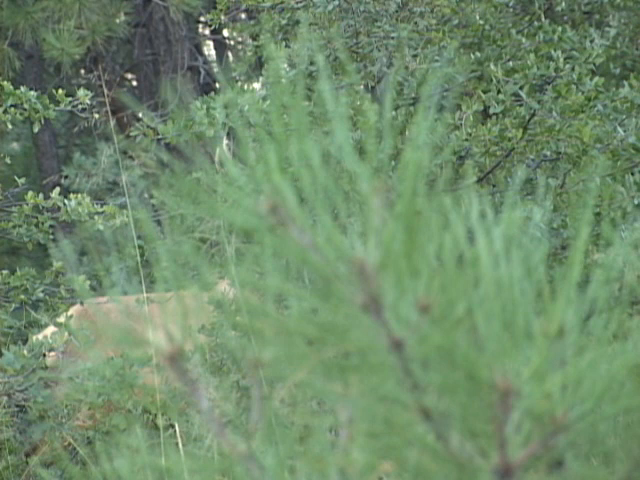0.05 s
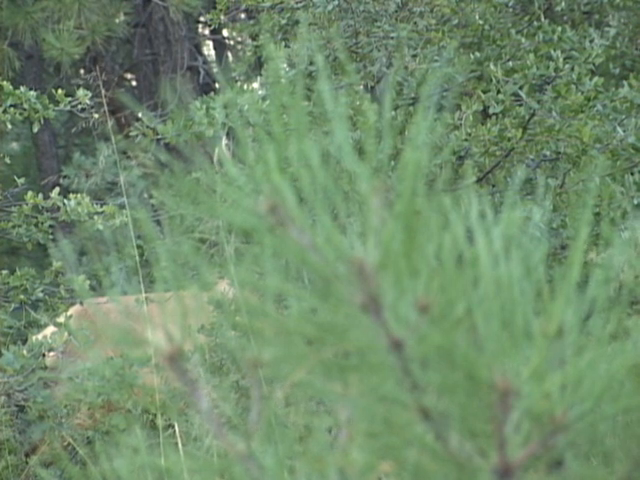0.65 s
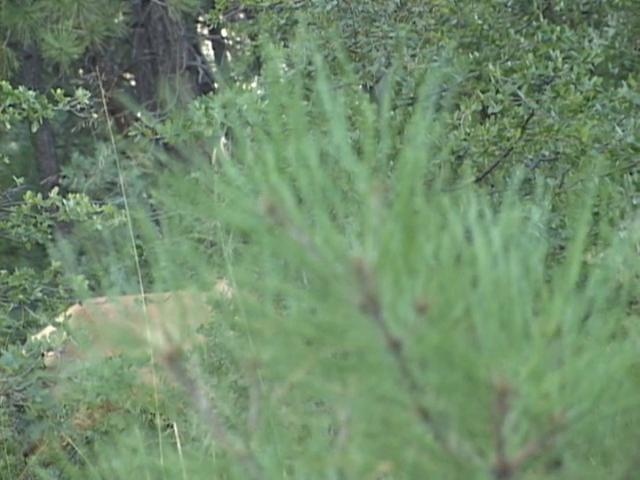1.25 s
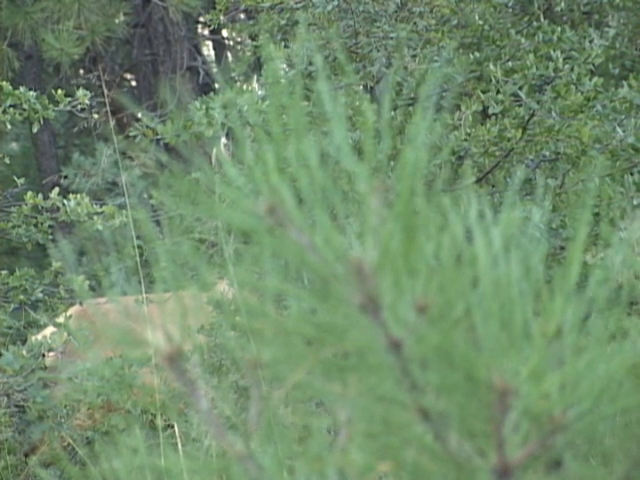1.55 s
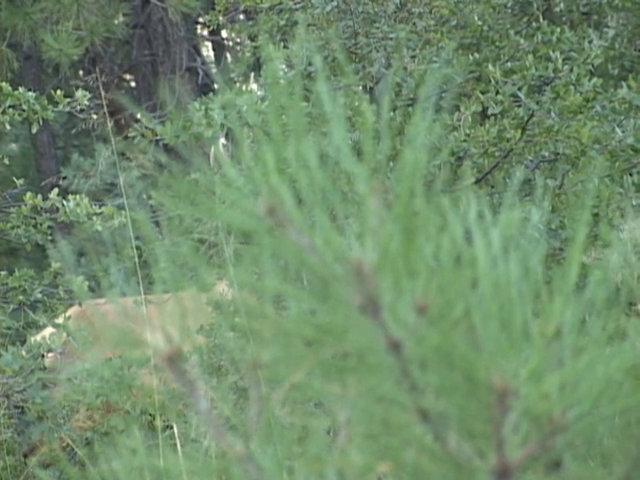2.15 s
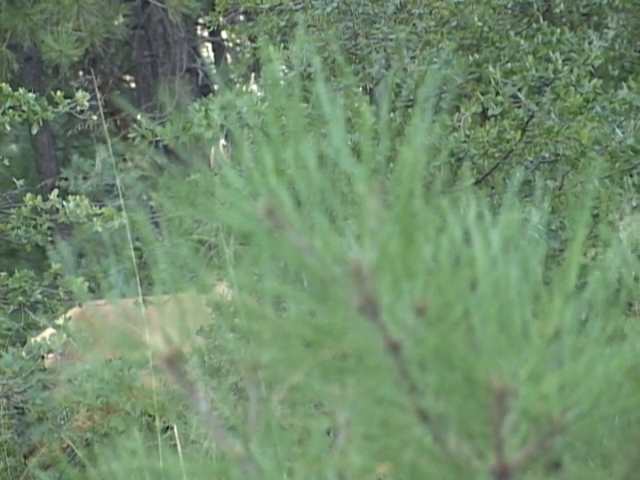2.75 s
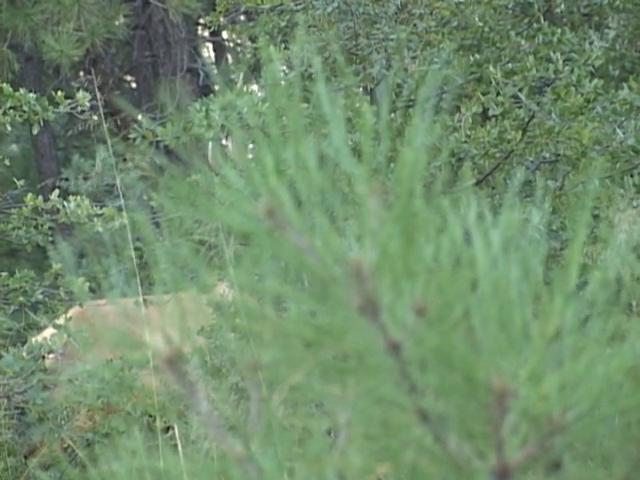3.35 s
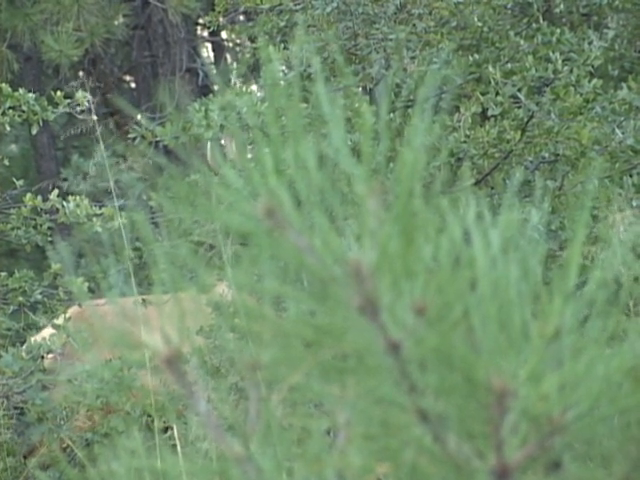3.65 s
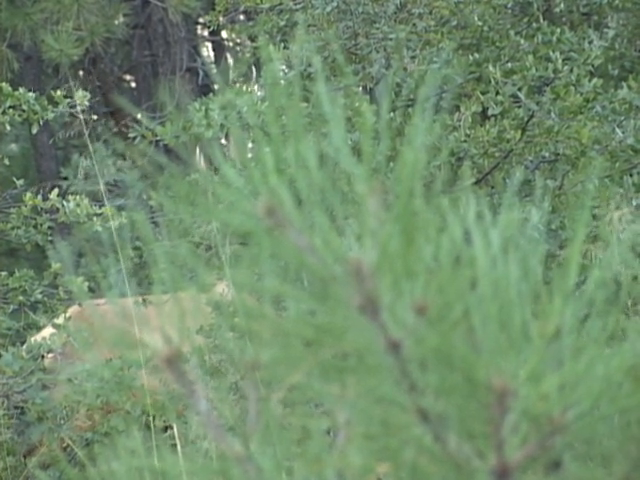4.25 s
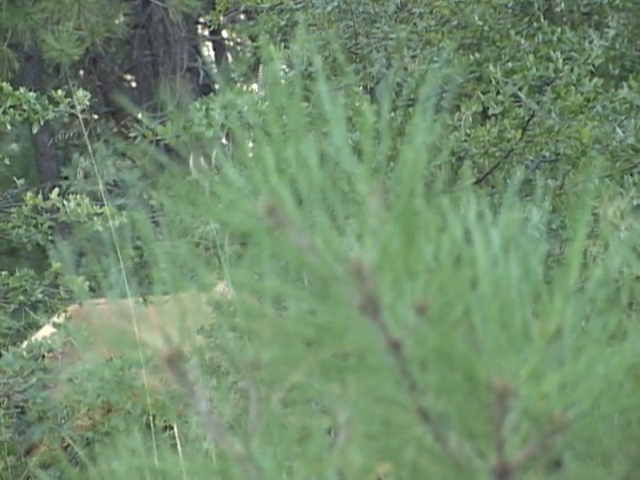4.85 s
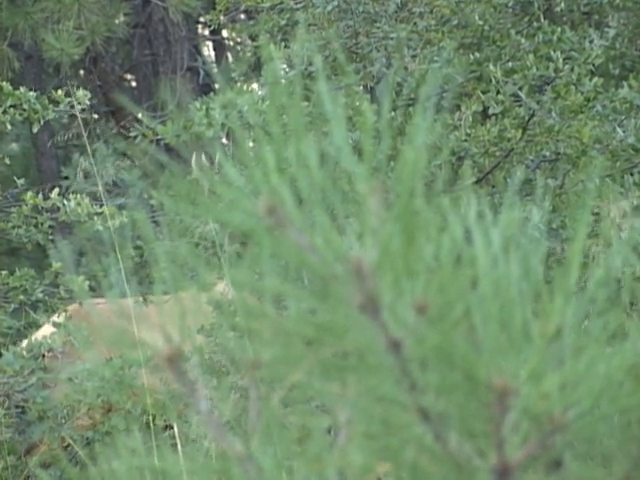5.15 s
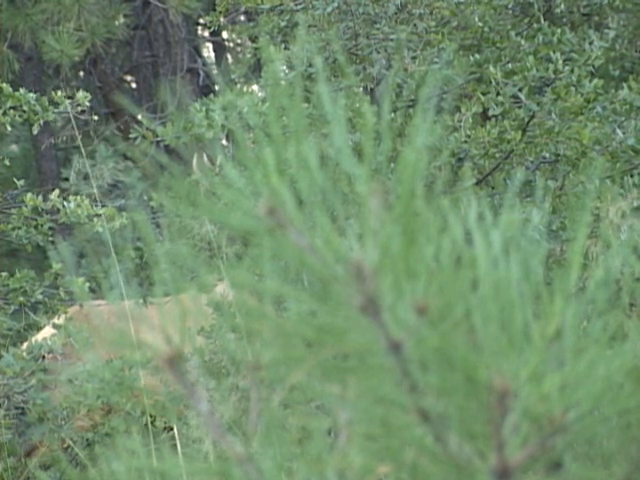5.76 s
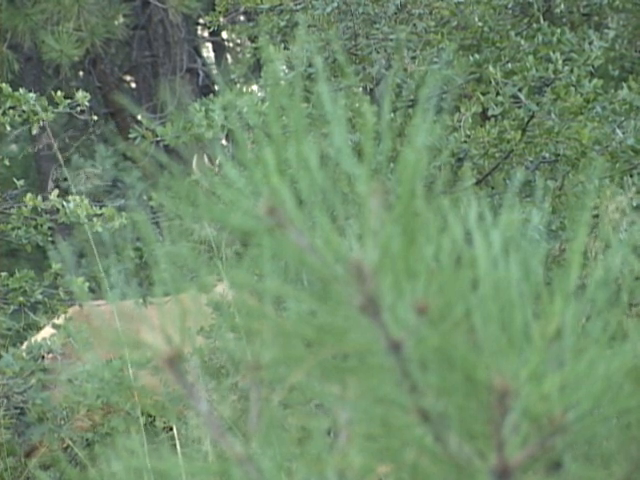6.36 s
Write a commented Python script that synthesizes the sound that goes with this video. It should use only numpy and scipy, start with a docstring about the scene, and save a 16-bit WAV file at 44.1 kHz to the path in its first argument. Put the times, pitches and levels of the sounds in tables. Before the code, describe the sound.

A quiet forest is heard through a camcorder microphone, with steady soft hiss and a faint motor whine throughout. In the first second there are light puffs of wind and a very faint, wavering low drone that fades away. From about 1.2 seconds a longer gust rumbles on the microphone with irregular dull thumps, easing around 4.5 seconds into smaller puffs. At about 5.3 seconds an elk, straight ahead and some way off, gives one short mew. It begins as a thin, high whistle, breaks at about 5.4 seconds and slides down more than an octave into a rough, nasal end by 5.7 seconds. Trunks and foliage scatter the call into an echo that dies away within about a second. Weak puffs of wind and the hiss continue until the end, at about 6.5 seconds.

```python
"""In a forest, an elk gives one mew some way from a camcorder. Its taut vocal folds make a thin,
high whistle that breaks and, as they slacken, slides down over an octave into a rough, nasal end.
Trunks and foliage scatter the call back. Wind eddies rumble and thump on the microphone
throughout, over the camcorder's own hiss and motor whine and a faint drone at the start."""
import sys
import numpy as np
from scipy import signal
from scipy.fft import rfft, irfft
from scipy.io import wavfile
from scipy.ndimage import uniform_filter1d

SR = 44100
rng = np.random.default_rng(int(sys.argv[2]) if len(sys.argv) > 2 else 0)


def store_wav(level_fs):
    """Save 16-bit WAV to argv[1]."""
    pcm = np.round(np.clip(np.atleast_2d(level_fs), -1, 1) * 32767)
    wavfile.write(sys.argv[1], SR, pcm.T.astype(np.int16))


N = 287532
TIME = np.arange(N) / SR
BINS = np.fft.rfftfreq(N, 1 / SR)
WHISTLE_HZ, SLACK_HZ, BREAK_S = 1096, 437.3, 5.444  # top of the mew, its floor, start of the slide


def gain_of(db):
    """Decibels to amplitude."""
    return 10 ** (np.asarray(db) / 20)


def unit_rms(x):
    """Scales to rms 1."""
    return x / np.sqrt(np.mean(x ** 2) + 1e-20)


def value_at(points, hz):
    """Reads (Hz, value) points, joined on a log-frequency axis."""
    point_hz, values = np.transpose(points)
    return np.interp(np.log(hz + 1), np.log(point_hz + 1), values)


def envelope(points):
    """Joins (seconds, value) points at every sample."""
    return np.interp(TIME, *np.transpose(points))


def coloured(x, spectrum):
    """Filters x by (Hz, dB) points."""
    return irfft(rfft(x) * gain_of(value_at(spectrum, BINS)), N)


def noise(spectrum):
    """Noise of rms 1 with the given spectral shape."""
    return unit_rms(coloured(rng.standard_normal(N), spectrum))


def wander(rate_hz):
    """Smooth random motion of rms 1, up to about the given rate."""
    return unit_rms(irfft(rfft(rng.standard_normal(N)) * np.exp(-(BINS / rate_hz) ** 2), N))


def hump(middle_s, half_s):
    """A flat-topped swell from 0 to 1 and back."""
    return np.exp(-((TIME - middle_s) / half_s) ** 4)


def hiss(level_db=-70):
    """Background air and microphone hiss, centred in the bass and wider in the treble."""
    # The colour of the hiss. Each row: frequency in Hz, relative level in dB.
    colour = [(30, 3), (150, -4), (220, -7.5), (320, -5.5), (480, -9), (600, -10), (800, -12),
              (1500, -17.5), (2600, -19.5), (5200, -21), (10000, -22.5), (15500, -23.5)]
    # Its stereo image. Each row: frequency in Hz, left-right correlation from 0 to 1.
    correlation = [(100, 1), (500, 0.99), (1200, 0.97), (2500, 0.95), (4500, 0.7), (8000, 0.57),
                   (15000, 0.47)]
    likeness = value_at(correlation, BINS)
    mid = noise(colour)
    side = irfft(rfft(noise(colour)) * np.sqrt((1 - likeness) / (1 + likeness)), N)
    return gain_of(level_db) * np.array([mid + side, mid - side])


def tone(hz, rms_db, waver_hz, flutter_db):
    """A sine that wavers a little in pitch and level."""
    phase = 2 * np.pi * np.cumsum(hz + waver_hz * wander(21)) / SR
    return gain_of(rms_db + flutter_db * wander(2.8)) * np.sqrt(2) * np.sin(phase)


def camcorder_whine():
    """Harmonics of the motor's 150 turns a second, and the camcorder's steady tones."""
    # The motor's harmonics. Each row: frequency in Hz, rms level in dB before the swell.
    harmonics = [(449.5, -92.5), (599.4, -89), (749, -88.5), (899, -91.5), (1049, -94), (1199, -100),
                 (1349, -95.5), (1648, -97), (1799, -99)]
    # How strongly the motor carries. Each row: time in seconds, gain in dB.
    swell = [(0, -9), (1.2, -2), (1.8, -0.5), (3.1, 2), (4.2, -1), (4.8, -1.5), (6.5, -5)]
    # The steady tones. Each row: frequency in Hz, rms level in dB, flutter depth in dB.
    tones = [(566, -85.5, 2.5), (5103, -98, .7), (6514, -103, .7), (7192, -104, .7)]
    swell_db = envelope(swell)
    motor = sum(tone(hz, db + swell_db, waver_hz=2.5, flutter_db=0.5) for hz, db in harmonics)
    return motor + sum(tone(hz, db, waver_hz=3.2, flutter_db=flutter) for hz, db, flutter in tones)


def drone(hz=230, waver=0.029, flutter_db=3):
    """A faint, wavering low tone that fades early."""
    # The drone's fade. Each row: time in seconds, level in dB.
    fade = [(0, -75), (.25, -69.5), (.45, -76), (.7, -71.5), (1.1, -100)]
    phase = 2 * np.pi * np.cumsum(hz * (1 + waver * wander(27))) / SR
    return gain_of(envelope(fade) + flutter_db * wander(27)) * np.sin(phase)


def wind_strength(calm_db=-62):
    """The wind's level in dB: calm air, one long gust and short puffs add their power."""
    # The long gust. Each row: time in seconds, level in dB.
    gust = [(1.14, -74), (1.22, -53), (1.42, -45), (1.95, -48), (2.2, -44.5), (2.52, -49), (2.66, -43.5),
            (3.3, -46), (3.5, -43.5), (3.8, -47.5), (4.03, -42.5), (4.1, -55.5), (4.22, -44), (4.42, -53),
            (4.55, -73)]
    # Puffs before and after it. Each row: middle in seconds, length in seconds, level in dB.
    puffs = [(0.032, 0.16, -52.5), (0.531, .18, -54.5), (.97, 0.27, -55), (4.551, 0.082, -47.5),
             (4.88, 0.21, -50.5), (5.185, .19, -48), (5.368, 0.097, -48.5), (5.487, 0.033, -53),
             (5.752, .15, -56.5), (5.948, .15, -52), (6.21, .14, -52.5), (6.383, 0.11, -55.5)]
    puff_power = sum(gain_of(db) ** 2 * hump(s, length / 2) for s, length, db in puffs)
    return 10 * np.log10(gain_of(calm_db) ** 2 + gain_of(envelope(gust)) ** 2 + puff_power)


def rumble(wind_db, coarse_db=-1.5, steadiness=0.57, fine_db=-50, fine_growth=1.93):
    """Small eddies roll over the microphone in lumps; fine ones grow fastest with the wind."""
    # The colour of the small eddies. Each row: frequency in Hz, relative level in dB.
    coarse_colour = [(12, -43), (22, -18.5), (40, -3), (65, 4), (95, 3), (140, -9), (190, -16), (250, -25),
                     (330, -37), (450, -47), (800, -66)]
    # The finer eddies of strong gusts. Each row: frequency in Hz, relative level in dB.
    fine_colour = [(70, -13.5), (130, 5), (180, -3.5), (240, -10.5), (300, -14.5), (380, -20.5),
                   (500, -28.5), (900, -56)]
    eddies = noise(coarse_colour)
    # their power comes from the gust, so it strays little over a few turns
    power = uniform_filter1d(eddies ** 2, size=3000) + 1e-6
    coarse = gain_of(wind_db + coarse_db) * unit_rms(eddies / np.sqrt(power) ** steadiness)
    fine = gain_of(fine_db + fine_growth * (wind_db - wind_db.max())) * noise(fine_colour)
    # each lump lasts a few hundredths of a second and leaves the gust's strength alone
    lumps = gain_of(3 * wander(32))
    lumps /= np.sqrt(uniform_filter1d(lumps ** 2, size=5000))
    return lumps * (coarse + fine)


def buffets(eddies, gain_db=0, skew_rad=0.87):
    """Each large eddy is one push and pull of pressure, a dull thump a cycle or two long."""
    pressure = np.zeros(N)
    for middle_s, db, hz, roundness in eddies:
        near = abs(TIME - middle_s) < 0.04
        phase = 2 * np.pi * hz * (TIME[near] - middle_s)
        thump = (1 - 1j * phase / roundness) ** -roundness
        lean = np.exp(1j * skew_rad * rng.standard_normal())  # tips the balance of push and pull
        pressure[near] += gain_of(db) * (thump * lean).imag
    return gain_of(gain_db) * pressure


def lesser_eddies(wind_db, per_s=8, over_wind_db=7, spread_db=2.5, centre_hz=124.3, roundness=6.6):
    """Rows for buffets(): eddies that arrive unevenly and follow the strength of the wind."""
    count = int(per_s * N / SR)
    late, strength, pitch, shape = rng.uniform(-1, 1, (count, 4)).T
    middle_s = (np.arange(count) + 0.5 + late / 2) / per_s
    db = np.interp(middle_s, TIME, wind_db) + over_wind_db + spread_db * strength
    return np.transpose([middle_s, db, centre_hz * (1 + 0.23 * pitch), roundness * 2 ** shape])


def wind_on_microphone(low_hz=26, high_hz=500):
    """Eddies of every size press on the microphone, which takes them up only in a low band."""
    # The strongest eddies. Each row: middle in seconds, relative level in dB, centre frequency in Hz,
    # roundness (low is abrupt, high swings longer).
    strong_eddies = [(1.02, -42, 145, 4.5), (1.439, -31, 128, 5.5), (1.466, -33.5, 131, 5.4),
                     (1.559, -33, 133, 4.4), (1.836, -32.5, 144, 9.4), (1.937, -39, 192, 5.6),
                     (1.987, -34, 142, 3.5), (2.034, -32.5, 156, 3.4), (2.198, -38, 175, 3.6),
                     (2.348, -38, 164, 14), (2.646, -28, 140, 3.9), (2.757, -31, 150, 2.6),
                     (2.812, -27.5, 135, 4.7), (2.945, -37, 172, 5.4), (3.065, -33, 158, 5.7),
                     (3.223, -32.5, 104, 5.1), (3.371, -39, 152, 2.4), (3.441, -31.5, 123, 3.9),
                     (3.584, -32, 171, 2), (3.673, -36, 146, 5.5), (3.752, -34.5, 134, 6),
                     (3.784, -34.5, 132, 8.4), (3.939, -35, 128, 3), (4.021, -31, 128, 4.5),
                     (4.149, -30.5, 159, 4.6), (4.26, -31, 152, 6.6), (4.551, -36.5, 127, 3.6),
                     (4.915, -41.5, 148, 3.9), (5.076, -41, 153, 9.5), (5.176, -40, 132, 5.6)]
    wind_db = wind_strength()
    pressure = rumble(wind_db) + buffets(strong_eddies, gain_db=1) + buffets(lesser_eddies(wind_db))
    rolloff = np.sqrt((1 + (low_hz / (BINS + 1)) ** 4) * (1 + (BINS / high_hz) ** 10))
    return irfft(rfft(pressure) / rolloff, N)


def forest_reverb(call, taps_per_s=2500, build_s=0.0033, width=0.041):
    """Trunks and foliage scatter the call into a dense tail, each band dying at its own speed."""
    # The forest's decay. Each row: frequency in Hz, seconds to fall by 60 dB.
    decay = [(500, 1), (1500, 1.5), (4000, 1.4), (8000, 2.4)]
    # The colour of the tail. Each row: frequency in Hz, gain in dB.
    colour = [(500, 7.5), (1200, 6), (2200, 0.5), (2900, -7.5), (3500, -1.5), (4300, -6), (6500, -8)]
    taps = rng.standard_normal((2, SR)) * (rng.random((2, SR)) < taps_per_s / SR)
    hz, t, bands = signal.stft(taps, SR, nperseg=256)
    bands *= gain_of(-60 * t / value_at(decay, hz)[:, None])
    bands *= 1 - np.exp(-t / build_s)
    _, tails = signal.istft(bands, SR, nperseg=256)
    tails /= np.linalg.norm(tails, axis=1, keepdims=True)
    mid, side = (coloured(signal.fftconvolve(call, tail)[:N], colour) for tail in tails)
    return np.array([mid + width * side, mid - width * side])


def trunk_echoes(call):
    """The nearest trunks each throw the call back once."""
    # The slaps off near trunks. Each row: delay in seconds, gain in dB.
    slaps = [(0.02, -14), (.078, -11)]
    return sum(gain_of(db) * np.interp(TIME - delay, TIME, call) for delay, db in slaps)


def mew_pitch(rise_hz_per_s=345, top_s=5.412, halfway_s=0.094, steepness=2.3):
    """The whistle climbs slowly, tips over at the break, then sinks ever more slowly."""
    whistle_hz = WHISTLE_HZ + rise_hz_per_s * np.clip(TIME - top_s, -1, 0)
    fall = (np.maximum(TIME - BREAK_S, 0) / halfway_s) ** steepness
    return SLACK_HZ + (whistle_hz - SLACK_HZ) / (1 + fall)


def harmonic_gains(slack, flare_s=5.411, flare_db=9, dip_db=-20, break_over_s=0.045):
    """Gains in dB of 14 harmonics: the second leads the whistle, but dips as the first flares up."""
    flare = hump(flare_s, half_s=0.022)
    whistling = 1 - np.clip((TIME - BREAK_S) / break_over_s, 0, 1)
    first_db = np.where(TIME < flare_s, -11, 3 * (1 - slack))
    first_db += (flare_db - first_db) * flare
    second_db = 11 * whistling + dip_db * flare
    return [first_db, second_db] + [0] * 12


def vocal_folds(hz, phase, slack, call_colour, shut_hz=3400, open_hz=6600, db_per_octave=45):
    """Harmonics sweep through the call's colour and fade above an edge that lifts as the mouth opens."""
    mouth_open = hump(middle_s=5.6, half_s=0.065)
    edge_hz = shut_hz + (open_hz - shut_hz) * mouth_open
    voice = np.zeros(N)
    for k, harmonic_db in enumerate(harmonic_gains(slack), 1):
        fade_db = db_per_octave * np.log2(np.maximum(k * hz / edge_hz, 1))
        voice += gain_of(value_at(call_colour, k * hz) + harmonic_db - fade_db) * np.cos(k * phase)
    return voice


def elk_mew(rough_taut=0.051, rough_slack=0.565, jitter=0.0241, shimmer=0.61, doubling=0.93,
            flicker_db=5):
    """The call is clean on the whistle, then rasps and flickers in level as it slides down."""
    # How hard the elk pushes. Each row: time in seconds, relative level in dB.
    effort = [(5.26, -92), (5.345, -76), (5.405, -73), (5.445, -79), (5.52, -67), (5.56, -67),
              (5.665, -77.5), (5.7, -79), (5.725, -100)]
    # The colour of the call as it reaches the microphone. Each row: frequency in Hz, gain in dB.
    call_colour = [(450, -13), (750, -8.5), (1100, -10), (1450, -9), (2200, -12), (2550, -7.5), (2950, 0),
                   (3350, 1.5), (3700, -3.5), (4100, -5.5), (4600, -7.5), (5600, -18), (6300, -8),
                   (7100, -39)]
    hz = mew_pitch()
    slack = np.clip((WHISTLE_HZ - hz) / (WHISTLE_HZ - SLACK_HZ), 0, 1)
    rough = rough_taut + (rough_slack - rough_taut) * slack ** 2
    hz *= 1 + jitter * rough * wander(160)
    phase = 2 * np.pi * np.cumsum(hz) / SR
    voice = vocal_folds(hz, phase, slack, call_colour)
    # in the rough end strong and weak cycles alternate now and then
    voice *= 1 + doubling * rough * wander(40) * np.cos(phase / 2)
    # air leaks through once a cycle and rasps with the same colour
    leak = rng.standard_normal(N) * (1 + np.cos(phase))
    rasp = gain_of(-1) * rough * unit_rms(coloured(leak, call_colour))
    level_db = envelope(effort) + flicker_db * rough * wander(55)
    voice *= 1 + shimmer * rough * wander(190)
    sounding = (TIME > effort[0][0]) & (TIME < effort[-1][0])
    return sounding * gain_of(level_db) * (voice + rasp)


def scene():
    """The elk straight ahead in its forest; wind and motor reach both channels alike."""
    mew = elk_mew()
    wind = wind_on_microphone()
    return mew + trunk_echoes(mew) + forest_reverb(mew) + wind + drone() + camcorder_whine() + hiss()


def record(dry, cutoff_hz=15800):
    """The camcorder's band limit cuts off the highest treble."""
    lowpass = signal.firwin(801, cutoff_hz, window=("kaiser", 8), fs=SR)
    return signal.oaconvolve(dry, lowpass[None], "same")


dry = scene()
out = record(dry)
store_wav(out)
```